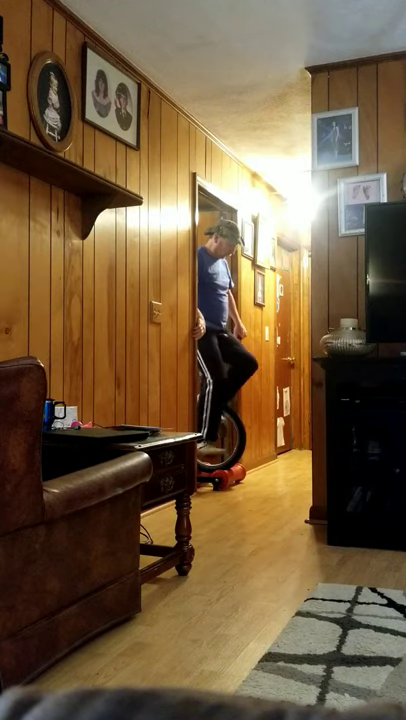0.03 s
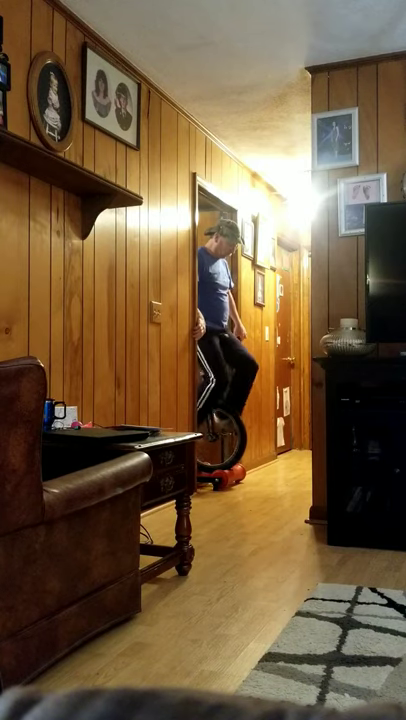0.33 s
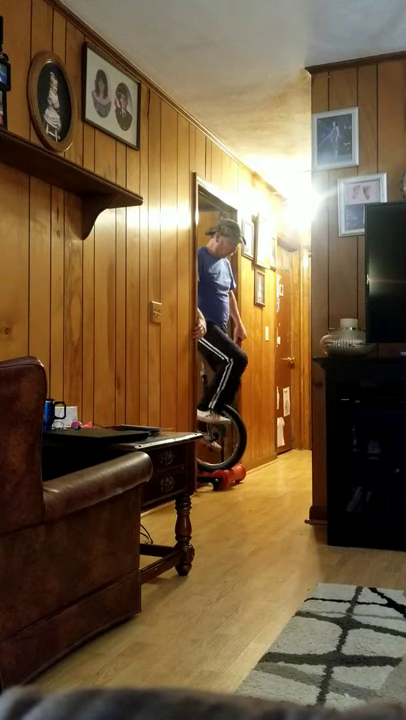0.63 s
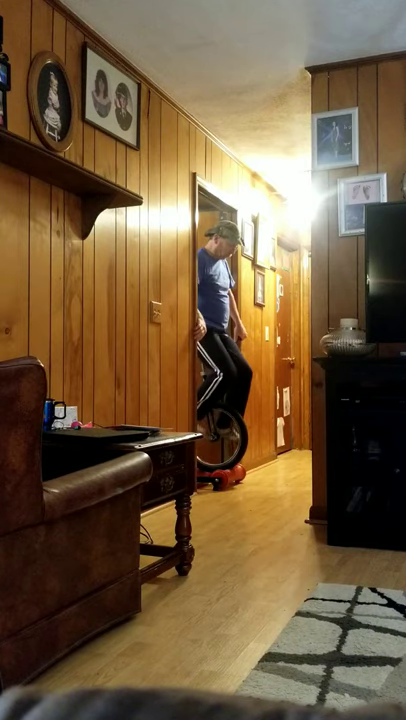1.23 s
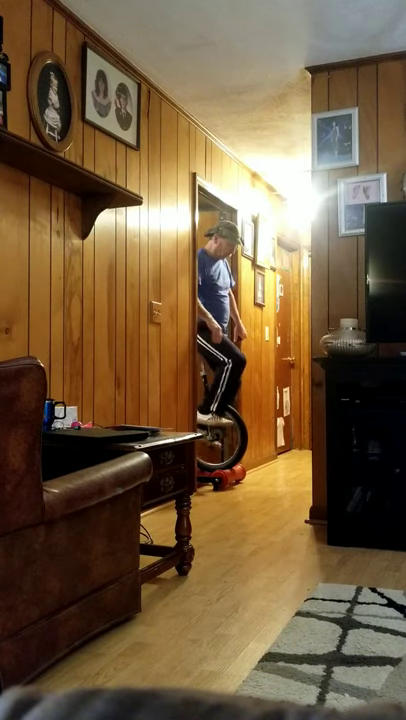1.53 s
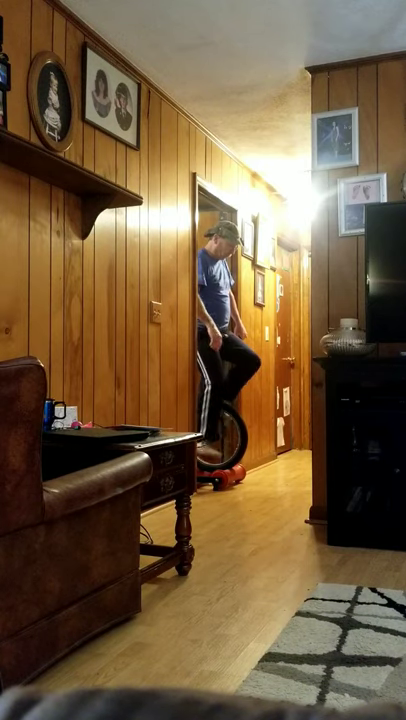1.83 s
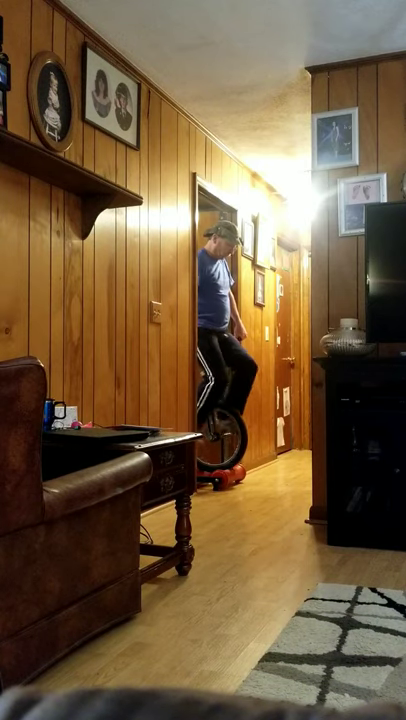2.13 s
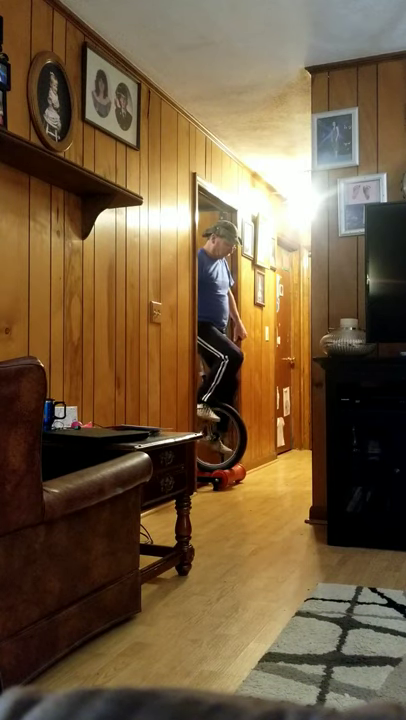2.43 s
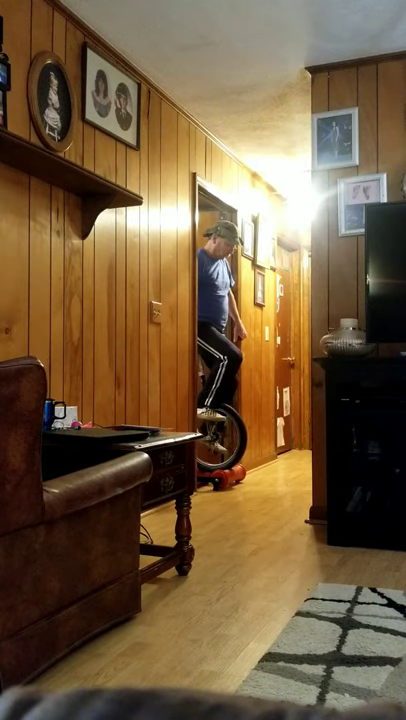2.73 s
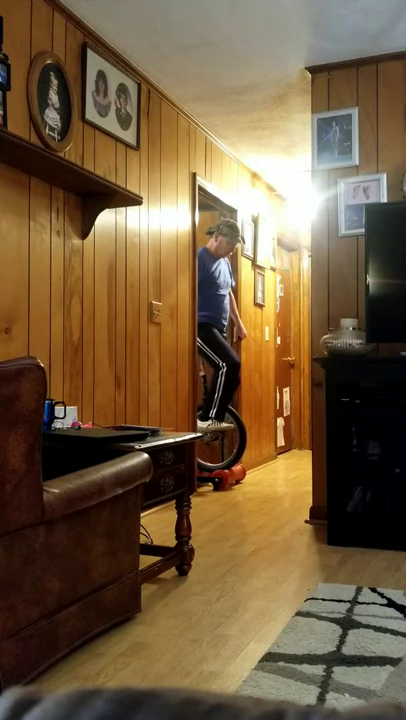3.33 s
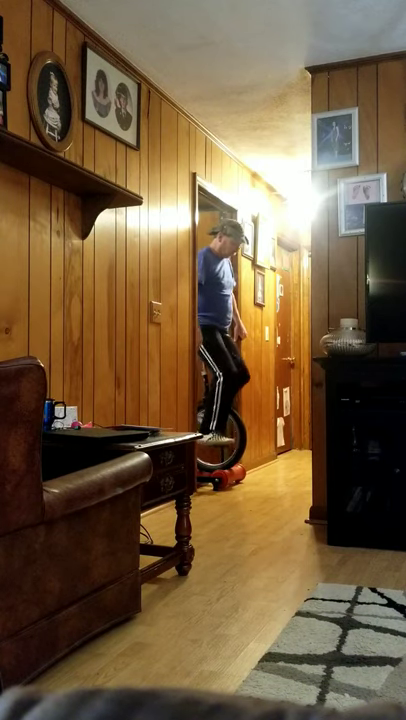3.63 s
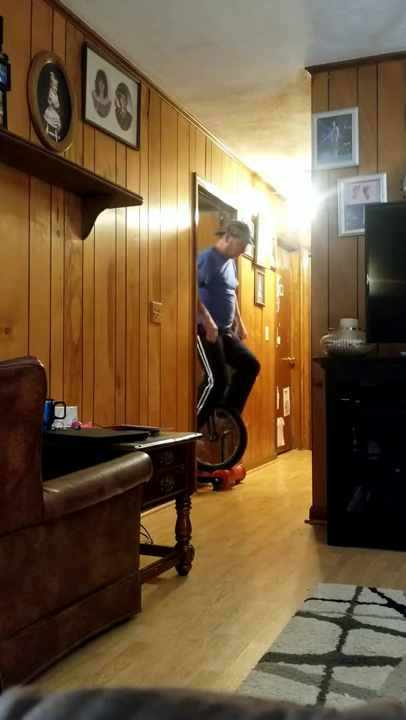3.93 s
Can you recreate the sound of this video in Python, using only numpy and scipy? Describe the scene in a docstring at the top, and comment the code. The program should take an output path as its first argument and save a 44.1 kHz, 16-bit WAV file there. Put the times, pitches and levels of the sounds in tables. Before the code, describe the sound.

A few metres away indoors, a unicycle on rollers hums, rumbles and hisses in uneven pulses. The wheel goes nearly quiet and something scuffs softly, then the stand thumps on the floor and pedalling restarts with a tiny squeak.

```python
"""A low hum surges and sags over rumble and hiss: a unicycle pedalled on a roller stand, a few metres
away in a wood-panelled room. Each push speeds up the unbalanced roller, which hums through the floor,
while the stand rumbles and the tyre tread hisses as it peels off the roller.
The wheel almost stops and something scuffs softly. Then the stand thumps on the floor
and the pedalling resumes with a tiny tyre squeak."""
import sys
import numpy as np
from scipy import signal
from scipy.fft import rfft, irfft, next_fast_len
from scipy.io import wavfile
from scipy.ndimage import map_coordinates

SR = 44100
rng = np.random.default_rng(int(sys.argv[2]) if len(sys.argv) > 2 else 0)


def persist_wave(psi):
    """Save psi, clipped to +-1, as 16-bit WAV."""
    counts = np.round(np.clip(psi, -1, 1) * 32767).astype(np.int16)
    wavfile.write(sys.argv[1], SR, np.atleast_2d(counts).T)


N = 176400
TIME_S = np.arange(N) / SR


def amp(db):
    """Decibels to gain."""
    return 10 ** (np.asarray(db) / 20)


def unit(x):
    """Scale to rms 1."""
    return x / np.sqrt(np.mean(x ** 2) + 1e-20)


def along(points, hz):
    """Interpolate (freq_hz, value) points on a log frequency axis."""
    freqs_hz, values = np.transpose(points)
    return np.interp(np.log(hz + 1), np.log(freqs_hz + 1), values)


def curves(rows):
    """Interpolate each column after time_s to one value per sample."""
    times_s, *columns = np.transpose(rows)
    return [np.interp(TIME_S, times_s, column) for column in columns]


def wobble(knots_per_s):
    """Smooth random curve."""
    return map_coordinates(rng.standard_normal(4096), [TIME_S * knots_per_s], mode="wrap")


def filtered(x, response):
    """Apply the frequency response(hz)."""
    size = next_fast_len(N + SR // 2)
    return irfft(rfft(x, size) * response(np.fft.rfftfreq(size, 1 / SR)), size)[..., :N]


def ringing(x, modes):
    """Direct vibration plus the ringing of each mode."""
    return filtered(x, lambda hz: 1 + sum(
        gain * 1j * hz * width_hz / (centre_hz ** 2 - hz ** 2 + 1j * hz * width_hz)
        for centre_hz, width_hz, gain in modes))


# Left-right likeness: freq_hz, coherence
COHERENCE = [(120, 0.92), (280, 1), (580, 0.96), (1000, 0.91), (2000, 0.17), (8000, 0.11)]
def spread(pair, gain):
    """Colour two unrelated signals by gain(hz) and mix to stereo, rms 1."""
    def response(hz):
        angle_rad = np.arccos(np.clip(along(COHERENCE, hz), -1, 1)) / 2
        return gain(hz) * [np.cos(angle_rad), np.sin(angle_rad)]
    mid, side = filtered(pair, response)
    return unit(np.array([mid + side, mid - side]))


def noise(spectrum):
    """Stereo noise with the given spectrum, rms 1."""
    return spread(rng.standard_normal((2, N)), lambda hz: amp(along(spectrum, hz)))


def resonance(centre_hz, width_hz):
    """Stereo noise in one narrow band, rms 1."""
    return spread(rng.standard_normal((2, N)), lambda hz: 1 / (1 + ((hz - centre_hz) / width_hz) ** 2))


def room(x, wet_db, t60_s=0.28):
    """Direct sound plus a short diffuse tail per channel."""
    t = np.arange(SR // 2) / SR
    tail = rng.standard_normal((2, len(t))) * amp(-60 * t / t60_s)
    tail /= np.linalg.norm(tail[0])
    return x + amp(wet_db) * signal.fftconvolve(np.atleast_2d(x), tail, axes=1)[:, :N]


# Roller motion under the pedal pushes: time_s, speed_hz, hum_db
ROLLER_MOTION = [(0.0, 81.9, -34), (0.08, 90.85, -35.5), (0.17, 109.1, -37), (0.26, 86.9, -34),
                 (0.35, 57.9, -40.5), (0.48, 94.5, -33.5), (0.6, 119.7, -41), (0.68, 121.9, -32),
                 (0.74, 103.1, -46.5), (0.8, 79.47, -39), (0.87, 100.6, -35.5), (0.95, 105.6, -34.5),
                 (1.05, 113.3, -37), (1.12, 102.6, -37.5), (1.18, 78.2, -36), (1.24, 76.54, -33.5),
                 (1.32, 109.1, -37), (1.4, 106.4, -34.5), (1.48, 110.8, -33.5), (1.54, 105.5, -38.5),
                 (1.63, 64.22, -34.5), (1.72, 73.57, -33), (1.82, 103.1, -37.5), (1.93, 112.7, -34.5),
                 (2.0, 106.1, -35.5), (2.07, 68, -35), (2.16, 69.83, -54.5), (2.21, 66.73, -37),
                 (2.33, 72.05, -36.5), (2.45, 89.7, -35.5), (2.53, 79.9, -36.5), (2.6, 69.9, -36),
                 (2.7, 55.8, -71), (3.55, 57.3, -74), (3.74, 65.3, -49.5), (3.8, 68.74, -34.0),
                 (3.85, 84.2, -35), (3.89, 115.5, -36), (3.95, 119.6, -35.5), (4.0, 99.6, -42.5)]
# Growl of overtones and stand, relative to a full push: time_s, gain_db
GROWL_ENVELOPE = [(0.0, 7), (.08, -1.5), (.17, -0.5), (.33, -6.5), (.47, -1), (.62, 1.5), (.79, -5),
                  (.87, 1), (1.05, -1), (1.2, -7.5), (1.33, 0), (1.5, -0.5), (1.66, -8), (1.86, 0.5),
                  (1.99, 1.5), (2.18, -16), (2.35, -7), (2.46, -3), (2.6, -8), (2.73, -35.5), (3.5, -40),
                  (3.72, -19), (3.86, 0), (4.0, -5)]
# Roller overtones on a full push: harmonic, level_db
ROLLER_OVERTONES = [(3, -61.5), (4, -68), (5, -66), (6, -71), (7, -71), (8, -73)]
# Low floor and room modes, beating with the hum: centre_hz, width_hz, signed_gain
HUM_MODES = [(77.2, 5.7, 0.97), (96.16, 3.26, 2.5), (102.3, 2.2, -0.6), (116.33, 11.5, 4)]
# Stand frame resonances: centre_hz, width_hz, signed_gain
STAND_MODES = [(156, 7, 3.5), (199, 11, 1.3), (295, 13, 2), (366, 11, 1.3), (452, 13, 3.4), (530, 20, 3),
               (558, 7, 3), (608, 11, 6), (684, 14, 1.9)]
def roller(flutter_db=1.0, waver_db=3.2, jitter_rad=0.26, second_harmonic_db=-29):
    """The unbalanced roller shakes the floor once a turn; its overtones ring the stand."""
    speed_hz, hum_db = curves(ROLLER_MOTION)
    growl_db, = curves(GROWL_ENVELOPE)
    phase = 2 * np.pi * np.cumsum(speed_hz) / SR
    shake = amp(hum_db + flutter_db * wobble(24.88))
    hum = ringing(shake * np.sin(phase), HUM_MODES)
    second = amp(second_harmonic_db) * shake * np.sin(2 * phase)
    overtones = sum(
        amp(level_db + waver_db * wobble(16)) * np.sin(harmonic * phase + jitter_rad * wobble(60))
        for harmonic, level_db in ROLLER_OVERTONES)
    whirr = ringing(second + amp(growl_db) * overtones, STAND_MODES)
    return np.sqrt(2) * (hum + room(whirr, wet_db=-2).mean(axis=0))


# Stand rumble: freq_hz, density_db
STAND_SPECTRUM = [(45, -7), (80, 16.5), (160, 1), (250, -2.5), (400, -2.5), (560, 0.5), (720, -4),
                  (950, -13.5), (1500, -38)]
def stand(full_push_db=-47, ring_db=-12, flutter_db=2.4):
    """Frame and floorboards rumble under the rolling wheel."""
    growl_db, = curves(GROWL_ENVELOPE)
    rumble = noise(STAND_SPECTRUM)
    ring = amp(ring_db) * unit(ringing(noise(STAND_SPECTRUM), STAND_MODES))
    return amp(full_push_db + growl_db + flutter_db * wobble(30)) * unit(rumble + ring)


# Tread hiss before make-up gain: time_s, level_db
HISS_ENVELOPE = [(.045, -62.5), (.095, -59), (.17, -56), (.28, -63.5), (.34, -72), (.4, -69), (.45, -61.5),
                 (.57, -56), (.68, -56), (.78, -64.5), (.85, -58), (1.06, -57), (1.21, -69), (1.32, -58.5),
                 (1.5, -58.5), (1.65, -67), (1.8, -58), (1.94, -56.5), (2.08, -68), (2.18, -85),
                 (2.25, -72.5), (2.33, -70.5), (2.42, -62), (2.51, -60), (2.6, -68.5), (2.72, -97),
                 (3.58, -100), (3.72, -84), (3.79, -68.5), (3.88, -55), (3.94, -53.5), (4, -56)]
# Tread hiss: freq_hz, density_db
TREAD_SPECTRUM = [(500, -26.5), (900, -3.5), (1600, -3), (2300, -1.5), (3500, -7.5), (5200, -10),
                  (7500, -16), (10000, -28.5), (14500, -23)]
# High stand resonances, relative to the hiss: centre_hz, width_hz, gain_db
TREAD_MODES = [(1322, 34, -13.5), (2830, 160, -15)]
def tyre(slips_per_s=900, slip_db=-3, makeup_db=4, flutter_db=0.71):
    """Tread peels off the roller in a dense crackle that also rings the stand."""
    hiss_db, = curves(HISS_ENVELOPE)
    slips = (rng.random(N) < slips_per_s / SR) * rng.standard_normal((2, N))
    contact = rng.standard_normal((2, N)) + amp(slip_db) * unit(slips)
    tread = spread(room(contact, wet_db=-6), lambda hz: amp(along(TREAD_SPECTRUM, hz)))
    rings = sum(amp(gain_db) * resonance(hz, width_hz) for hz, width_hz, gain_db in TREAD_MODES)
    return amp(hiss_db + makeup_db + flutter_db * wobble(45)) * (tread + rings)


# Fine tread fizz: freq_hz, density_db
FIZZ_SPECTRUM = [(9500, -33), (12000, -1.5), (14500, -4.5)]
def rub(ring_db=-67, fizz_db=-69.5, full_speed_hiss_db=-55.5):
    """Light rubbing rings the wheel and makes the tread fizz; both fade less than the hiss."""
    hiss_db, = curves(HISS_ENVELOPE)
    effort_db = hiss_db - full_speed_hiss_db
    ring = amp(ring_db + 0.39 * effort_db) * resonance(centre_hz=2051, width_hz=70)
    fizz = amp(fizz_db + 0.4 * effort_db) * noise(FIZZ_SPECTRUM)
    return ring + fizz


# Room tone: freq_hz, density_db
AIR_SPECTRUM = [(15, -59.5), (25, -10.5), (90, 2.5), (161, -10.5), (233, -6.5), (577, -24), (1390, -33),
                (2010, -36), (5600, -41.5), (8460, -54), (12000, -35)]
def room_tone(air_db=-58, drone_db=-63.5):
    """Quiet steady noise with a faint low drone."""
    air = amp(air_db) * noise(AIR_SPECTRUM)
    return air + amp(drone_db) * resonance(centre_hz=214, width_hz=15)


# Rumble swells near standstill: peak_s, width_s, level_db
CREEP_SWELLS = [(2.1, 0.06, -44.5), (2.623, 0.057, -41), (3.0, 0.025, -53), (3.661, 0.12, -54)]
# Creeping wheel: freq_hz, density_db
CREEP_SPECTRUM = [(35, -23), (70, 2.5), (115, 4), (170, -17.5), (300, -23.5), (520, -22.5), (800, -42),
                  (1500, -57.5)]
def creep():
    """The loaded wheel rumbles dully when it turns slowly."""
    envelope = sum(amp(level_db) * np.exp(-((TIME_S - peak_s) / width_s) ** 2)
                   for peak_s, width_s, level_db in CREEP_SWELLS)
    return envelope * noise(CREEP_SPECTRUM)


# Scuffs in the pause: peak_s, rise_s, fall_s, level_db, tilt_db_per_octave
SCUFF_EVENTS = [(2.82, .01, 0.065, -69.5, 0.5), (3.01, 0.026, 0.055, -70, -6),
                (3.089, 0.052, 0.07, -66, -0.5), (3.365, .012, 0.041, -69.5, -8.5)]
# Scuff before tilt: freq_hz, density_db
SCUFF_SPECTRUM = [(500, -5.5), (1700, 2), (2080, 10.5), (2500, 4.5), (3200, 9), (4600, 9.5), (6500, 1),
                  (10000, -27)]
def scuffs():
    """Brief soft rubs swell and die away."""
    out = np.zeros((2, N))
    for peak_s, rise_s, fall_s, level_db, tilt in SCUFF_EVENTS:
        envelope = np.exp(-np.maximum((peak_s - TIME_S) / rise_s, (TIME_S - peak_s) / fall_s))
        spectrum = [(hz, db + tilt * np.log2(hz)) for hz, db in SCUFF_SPECTRUM]
        out += amp(level_db) * envelope * noise(spectrum)
    return out


# Knocks of the stand: start_s, level_db
THUMP_EVENTS = [(3.734, -48), (3.756, -32.5)]
# Modes of the stand on the floor: pitch_hz, gain_db, t60_s
THUMP_MODES = [(124, 2.5, 0.1), (153, 4.5, 0.088), (200.6, -6, 0.15)]
def thumps(attack_s=0.0039):
    """Shifting weight knocks the stand against the floor."""
    out = np.zeros(N)
    for start_s, level_db in THUMP_EVENTS:
        age_s = np.maximum(TIME_S - start_s, 0)
        ring = sum(amp(level_db + gain_db - 60 * age_s / t60_s) * np.sin(2 * np.pi * pitch_hz * age_s)
                   for pitch_hz, gain_db, t60_s in THUMP_MODES)
        out += (1 - np.exp(-age_s / attack_s)) * ring
    return room(out, wet_db=-11)


def squeak(start_s=3.938, fall_s=0.01, level_db=-50):
    """The tyre gives a tiny high chirp on the hardest push."""
    age_s = TIME_S - start_s
    envelope = (age_s > 0) * np.exp(-np.abs(age_s) / fall_s)
    return amp(level_db) * envelope * resonance(centre_hz=6050, width_hz=420)


def scene():
    """Unicycle and stand over the room tone."""
    background = room_tone()
    rolling = roller() + stand() + tyre() + rub()
    return background + rolling + creep() + scuffs() + thumps() + squeak()


# Microphone port balance: freq_hz, left_minus_right_db
PORT_BALANCE = [(120, 2), (250, 3), (500, -1.4), (2000, -0.5), (4000, 0.5), (8000, 1), (12500, -1.5)]
def record(dry, left_lead_s=0.00023, cutoff_hz=14550):
    """Two band-limited microphone ports, each with its own colour; sound reaches the left first."""
    side = np.array([[1], [-1]])
    def response(hz):
        colour = amp(side * along(PORT_BALANCE, hz) / 2)
        time_shift = np.exp(1j * np.pi * hz * left_lead_s * side)
        return (hz < cutoff_hz) * colour * time_shift
    return filtered(dry, response)


dry = scene()
out = record(dry)
persist_wave(out)
```